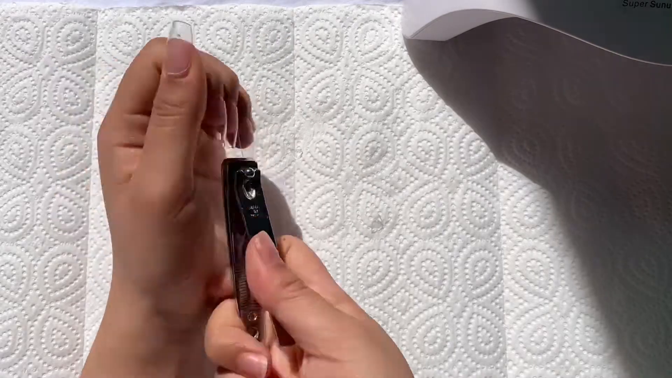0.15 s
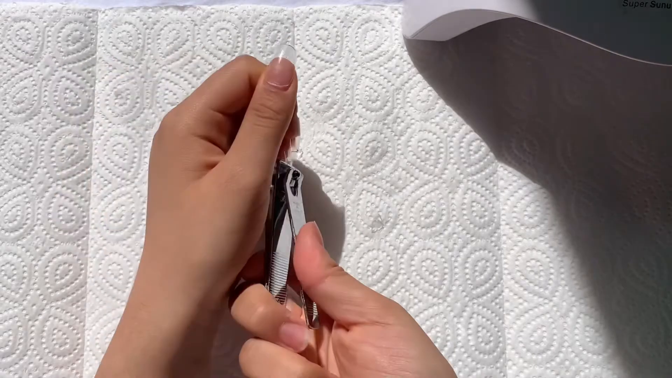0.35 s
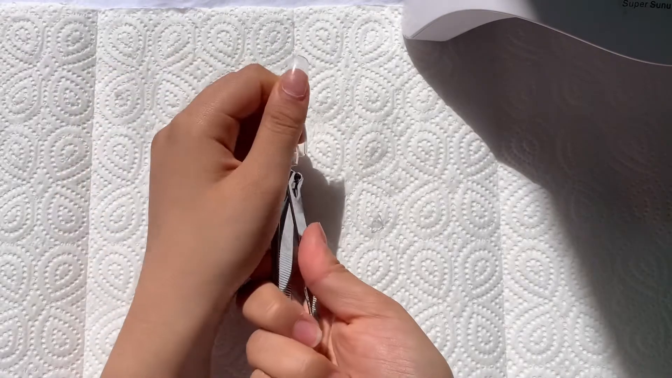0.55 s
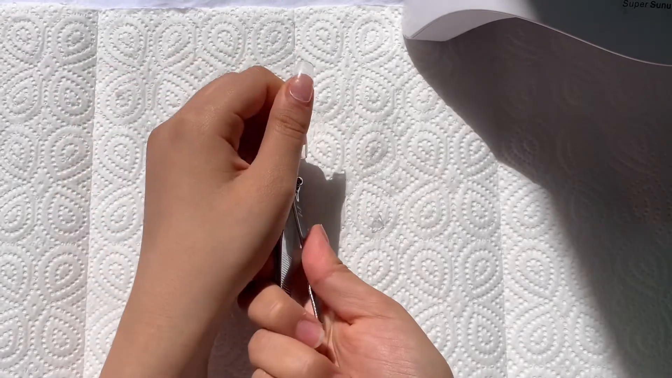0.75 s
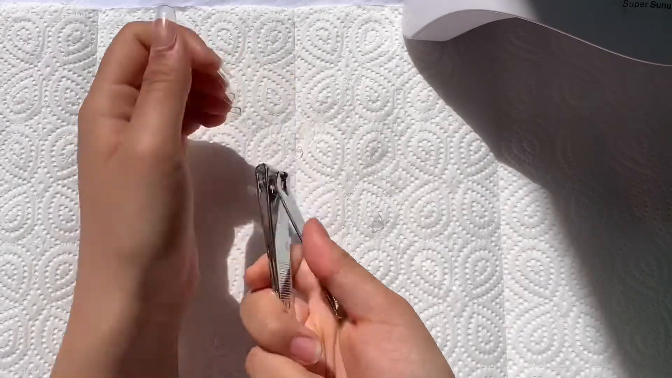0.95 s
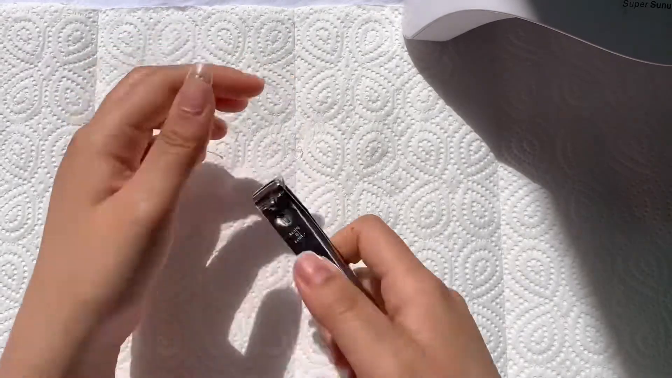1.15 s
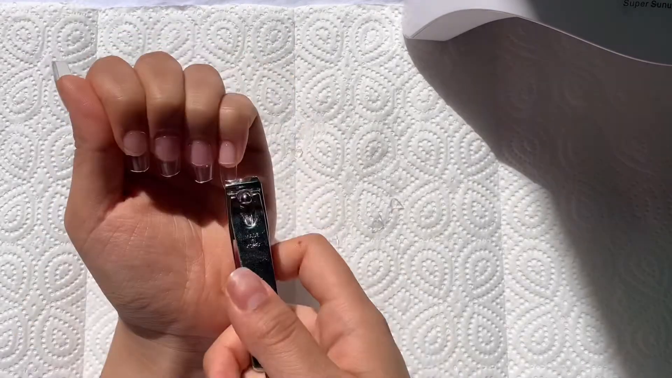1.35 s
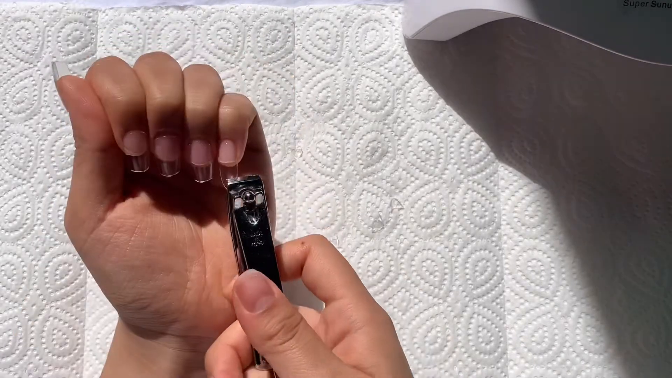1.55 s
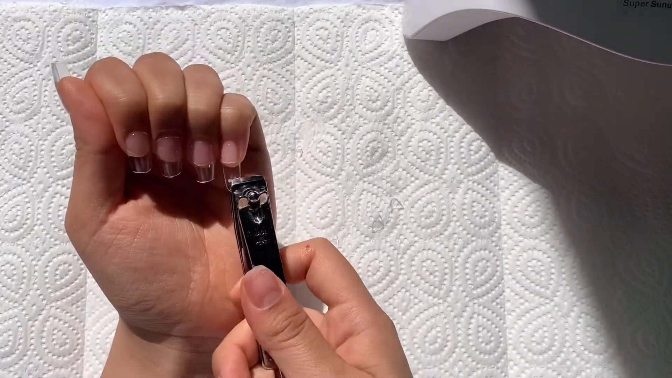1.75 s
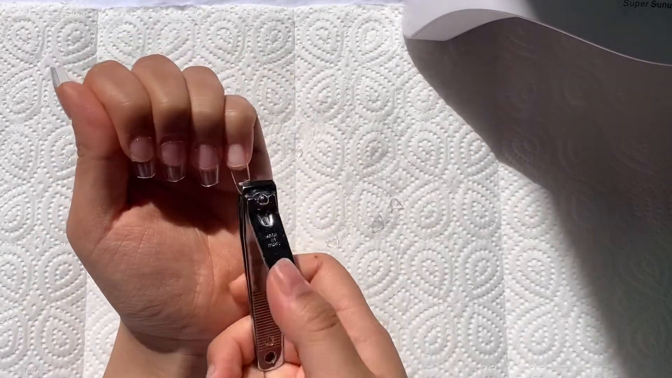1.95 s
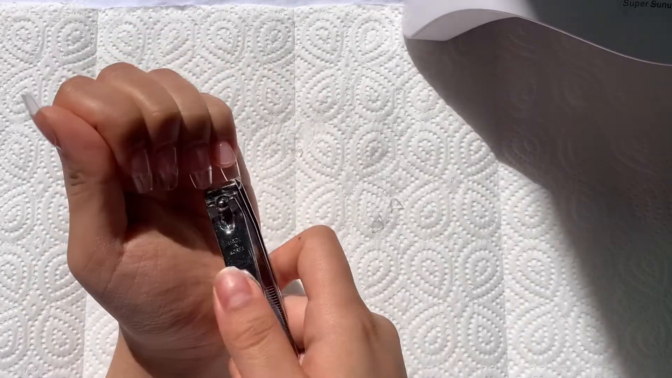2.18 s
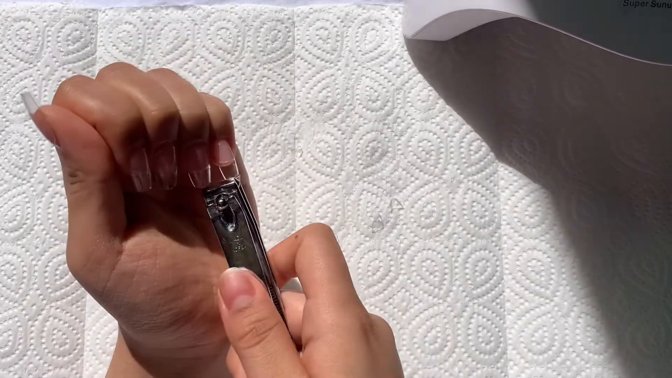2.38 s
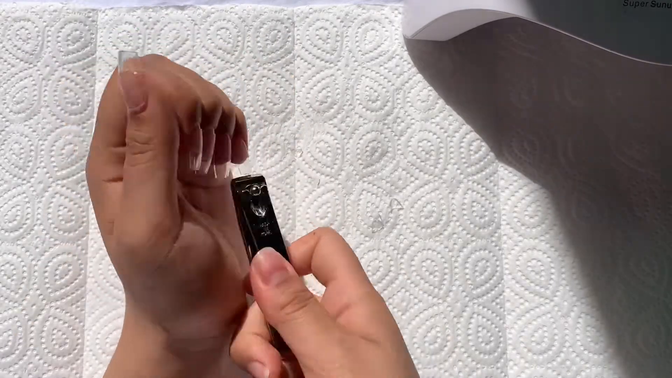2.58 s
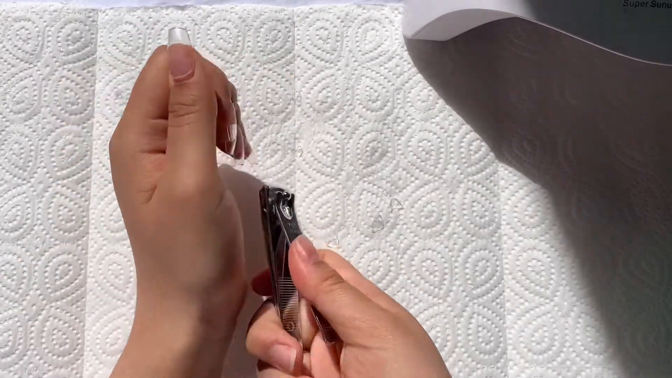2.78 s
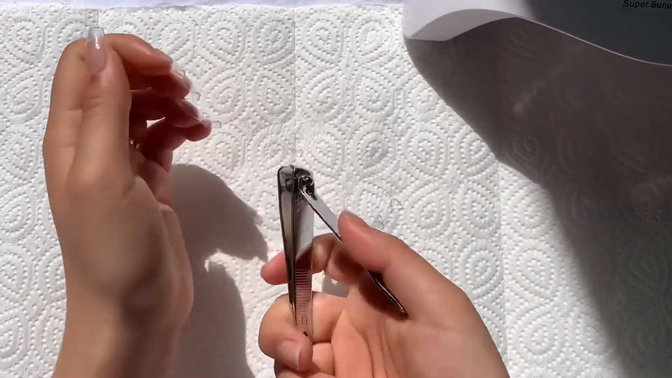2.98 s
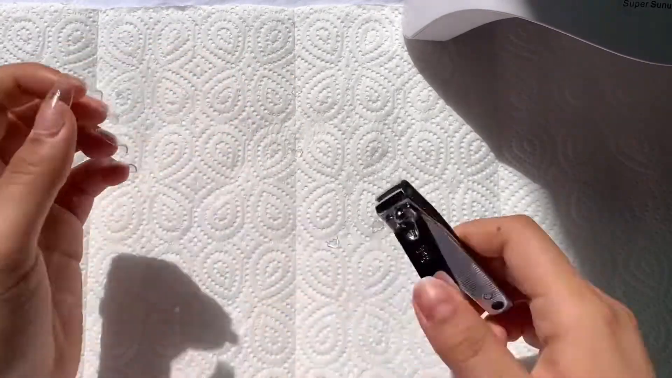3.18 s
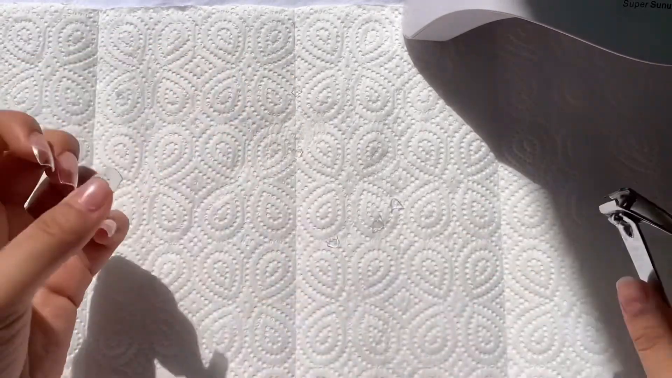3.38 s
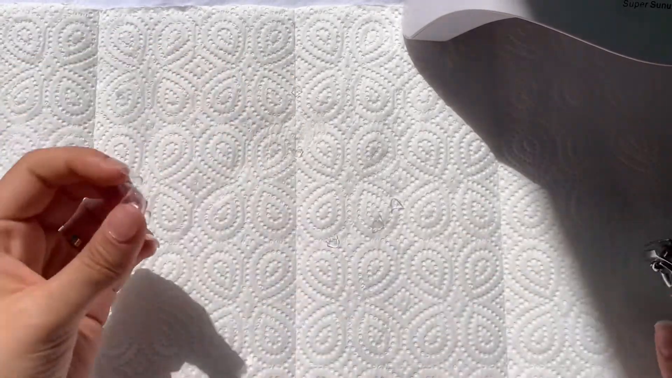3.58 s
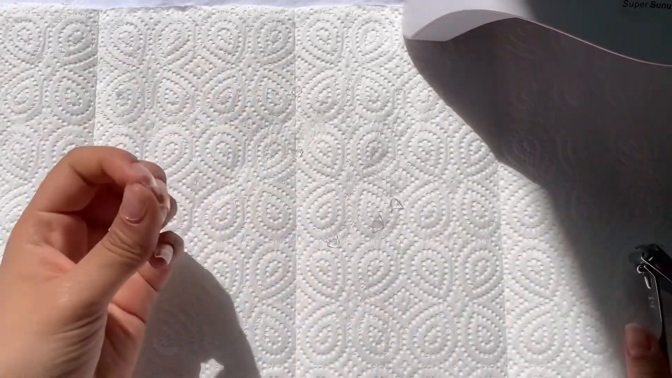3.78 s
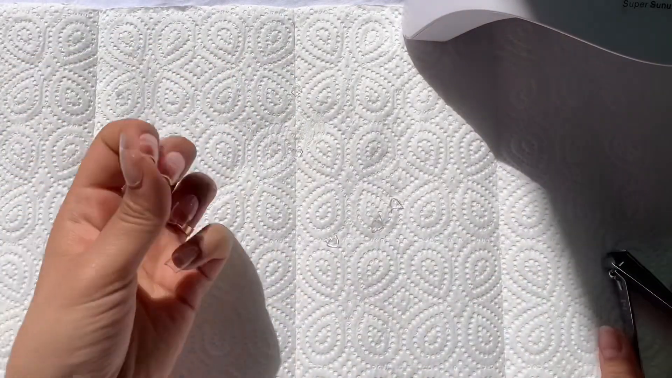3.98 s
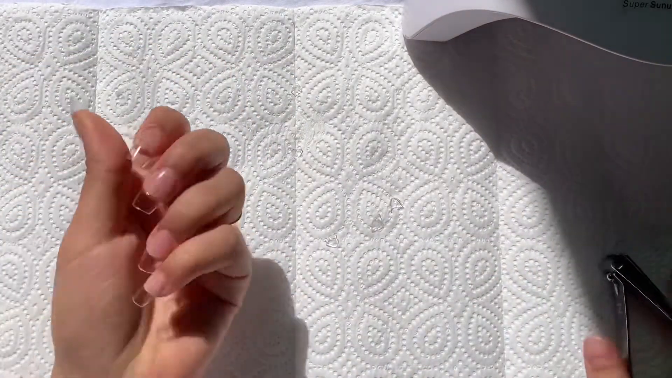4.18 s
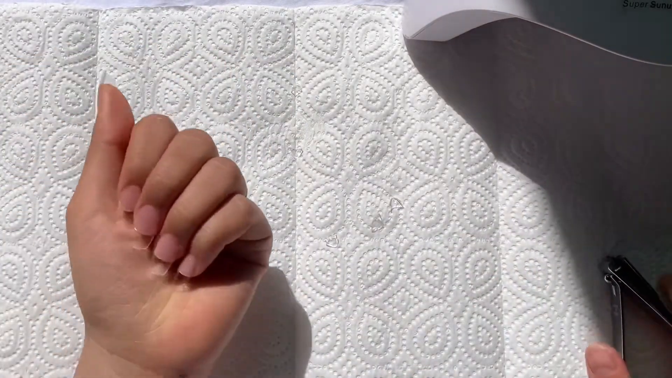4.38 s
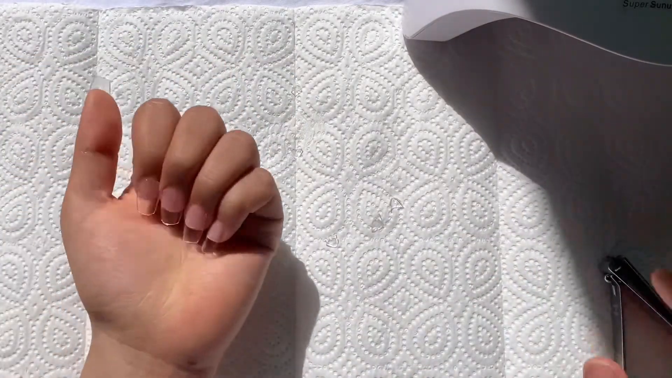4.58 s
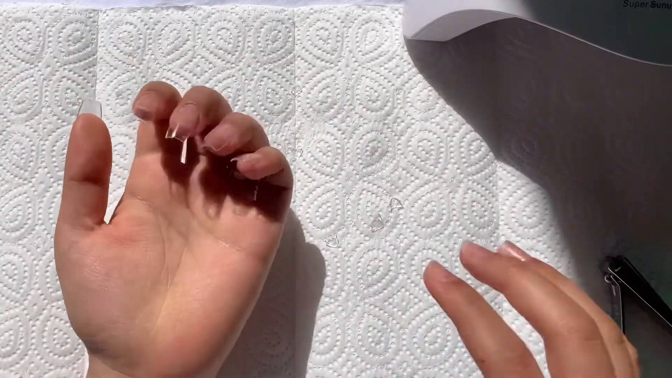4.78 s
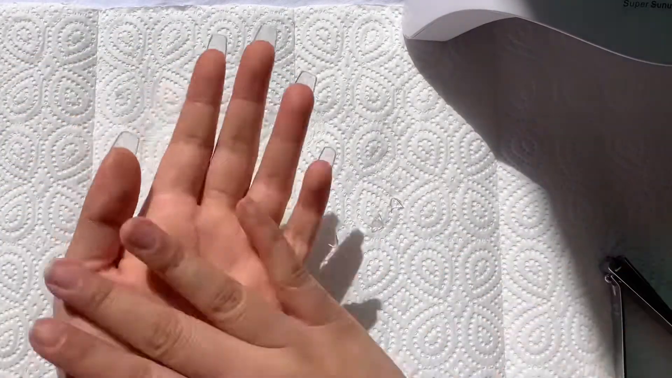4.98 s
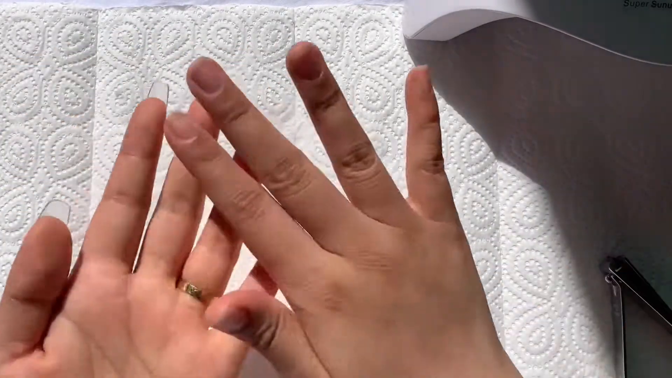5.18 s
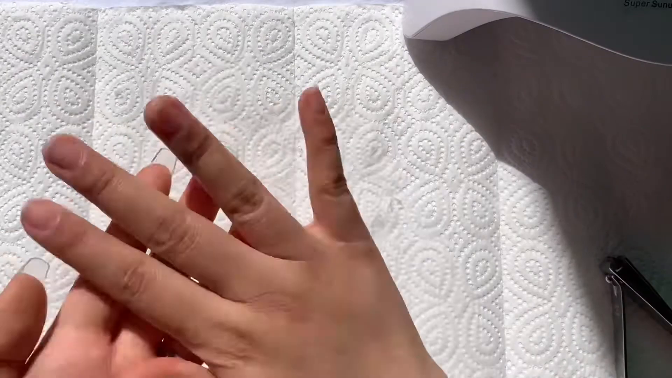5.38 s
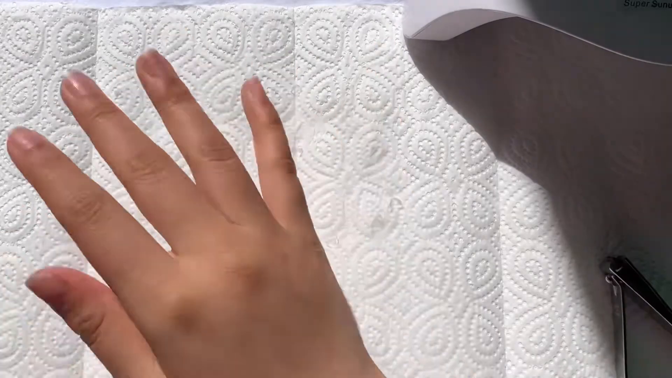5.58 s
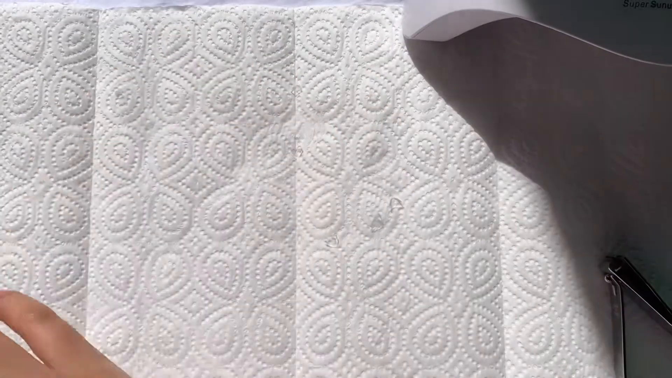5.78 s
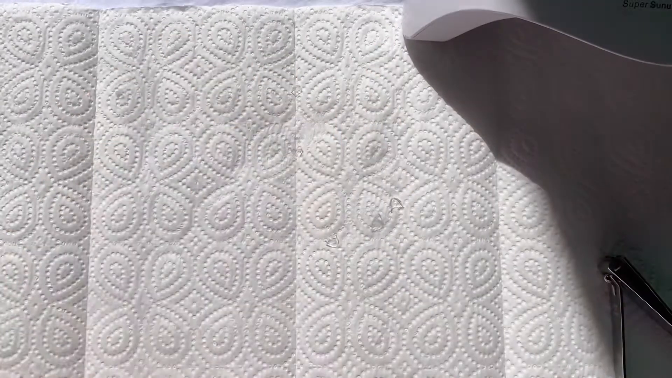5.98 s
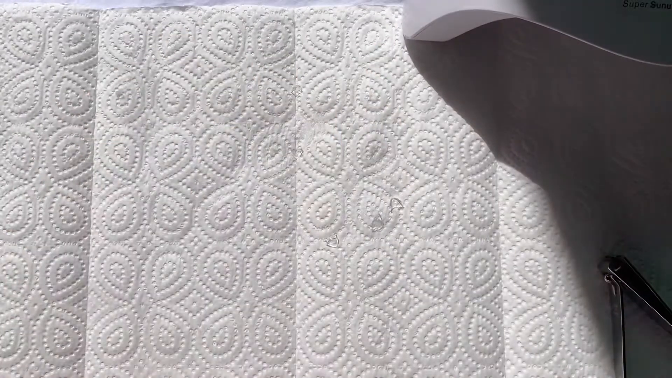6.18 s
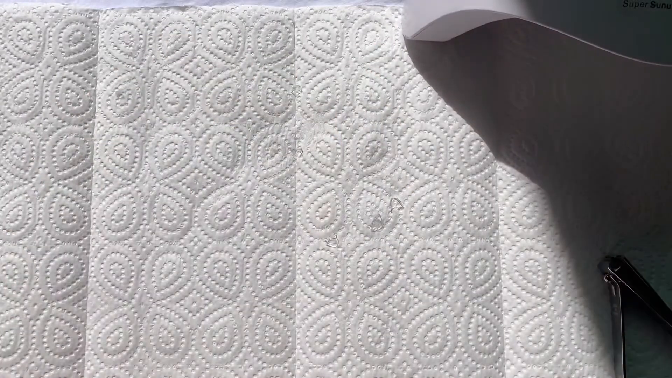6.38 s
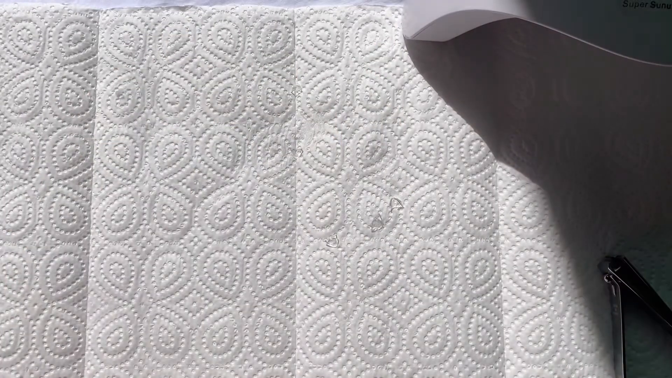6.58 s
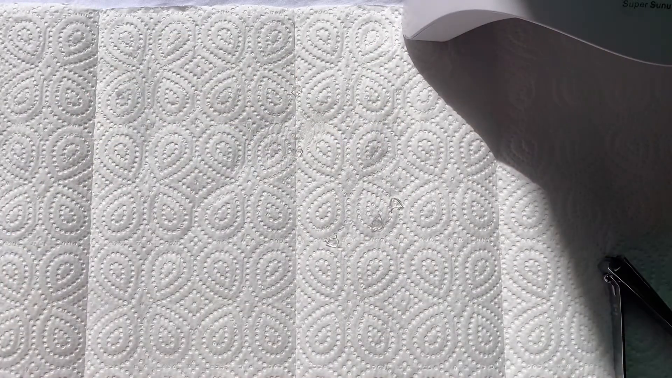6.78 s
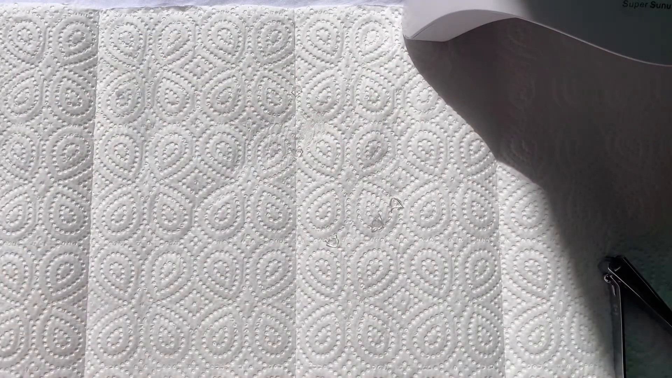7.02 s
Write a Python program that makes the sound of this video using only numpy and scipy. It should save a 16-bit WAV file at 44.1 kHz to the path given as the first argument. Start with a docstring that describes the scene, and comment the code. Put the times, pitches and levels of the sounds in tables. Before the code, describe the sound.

A nail clipper snips three hard plastic tips with sharp, bright cracks very close up, then small ticks, brief palm brushes and a faint creak.

```python
"""A low room murmur and a faint finger rub, then a steel nail clipper snips three plastic nail tips, very close.
The first two snips are several close cracks, the third a single one: noise and modes ring, a small room answers.
A loose lever ticks in between; fingers, cut edges and a palm brushing twice are shaped friction noise.
Last, something creaks softly further off: dull noise, a sinking rough note and slips that ring a body."""
import sys
import numpy as np
from scipy import signal
from scipy.fft import rfft, irfft, next_fast_len
from scipy.io import wavfile
from scipy.ndimage import uniform_filter1d, minimum_filter1d

SR = 44100
rng = np.random.default_rng(int(sys.argv[2]) if len(sys.argv) > 2 else 0)


def log_audio(samples):
    """Write samples as a 16-bit WAV file to the path given in sys.argv[1]."""
    # one column per channel
    frames = np.atleast_2d(samples).T
    # limit to full scale, then quantise
    limited = np.clip(frames, -1, 1)
    pcm = np.round(limited * 32767).astype(np.int16)
    wavfile.write(sys.argv[1], SR, pcm)


N = 310901
TIME = np.arange(N) / SR
BLOW = TIME[:SR // 10]  # time axis of one short blow [s]
CUTOFF_HZ = 16250  # the final low-pass closes here


# cracks running through the tips: (time [s], force [dB], brightness [dB/octave], ring length [share],
#   send to the room [dB], tip pitch [Hz], tip level [dB], tip level towards the room [dB],
#   fracture noise towards the room [dB], highest pitch towards the room [Hz],
#   bounce off a nearby surface [dB], jaws' ring towards the room [dB])
SNIPS = [(0.4845, -1, 6, 0.47, -4, 12020, -13, -12, -17.5, 16000, -23, -3),
         (0.4852, -2.5, 7.5, 0.3, -9.5, 13660, -10.5, -3, -19.5, 17000, -21.5, -8.5),
         (0.4872, -22, -3.5, 0.45, -11, 2130, -20, -23, -18.5, 9000, -18, -3.5),
         (1.5, -20.5, 2, 0.76, -12, 13300, -10.5, -7, -21.5, 13600, -19.5, -3.5),
         (1.5028, -21, 3, 0.97, -12, 6000, -7, -17, -17, 13000, -20, 0),
         (1.5054, 3.5, 9, 0.45, -16, 12690, -7, -7, -14, 12500, -32, -4.5),
         (2.4523, 9, 4, 0.87, -17, 4030, -12, -19, -13, 14500, -23.5, 0)]
# modes of the clipper, before damping: (frequency [Hz], level [dB], T60 [s])
CLIPPER_MODES = [(1993, -32.5, 0.025), (3060, -35, 0.012), (4140, -26, 0.023), (4490, -31, 0.042),
                 (5620, -29.5, 0.019), (7360, -24.5, 0.009), (8110, -18.5, 0.0092), (9000, -21.5, .006),
                 (10270, -12.5, 0.014), (10484, -20, 0.007), (11830, -28, 0.012), (13300, -22, 0.013),
                 (13800, -28, 0.0096), (15600, -28.5, 0.012)]
BOUNCE_S = 0.0068
JAW_NULL_HZ = 2460  # the jaws hardly radiate between their two lowest modes


def snips():
    """Brittle fracture excites tip and jaw modes; returns the direct sound and what goes to the room."""
    direct, sent = np.zeros(N), np.zeros(N)
    for (s, force_db, tilt_db, length, room_db, tip_hz, tip_db, tip_room_db,
         spray_db, top_hz, bounce_db, jaws_db) in SNIPS:
        near_modes = CLIPPER_MODES + [(tip_hz, tip_db, 0.010)]
        near = strike(tilt_db, length, near_modes, spread_s=0.0006, crack_db=-19.0, crack_s=0.0007, low_hz=1640)
        snap = from_db(force_db) * near
        add(direct, s, snap)
        add(direct, s + BOUNCE_S, from_db(bounce_db) * snap)

        # the room gathers all directions, and so more of the broad fracture noise
        jaws = [(hz, level_db + jaws_db, t60) for hz, level_db, t60 in CLIPPER_MODES]
        wide_modes = jaws + [(tip_hz, tip_room_db, 0.010)]
        wide = strike(tilt_db, length, wide_modes, spread_s=0.001, crack_db=spray_db, crack_s=0.0028, low_hz=1140)
        hand_shade = signal.butter(4, top_hz, fs=SR, output="sos")  # the hand shades the treble
        add(sent, s, from_db(force_db + room_db) * signal.sosfilt(hand_shade, wide))
    return signal.lfilter(*signal.iirnotch(JAW_NULL_HZ, 2, fs=SR), direct), sent


def strike(tilt_db, length, modes, spread_s, crack_db, crack_s, low_hz):
    """Modal synthesis: a decaying noise burst plus damped sinusoids, high-passed as small radiators are."""
    hz, level_db, t60 = np.transpose(modes)[:, :, None]
    # dispersion of bending waves in steel: the treble arrives first
    age = np.maximum(BLOW - spread_s * (1 - hz / CUTOFF_HZ), 0)
    decay = np.exp(-np.log(1000) * age / (t60 * length))
    ring = np.sum(from_db(level_db) * np.sin(2 * np.pi * hz * age) * decay, axis=0)
    crack = from_db(crack_db) * rng.standard_normal(len(BLOW)) * np.exp(-BLOW / (crack_s * length))
    # spectral tilt about 10 kHz, level below 2 kHz
    blow = shape(ring + crack, lambda f: from_db(tilt_db * np.log2(np.maximum(f, 2000) / 10000)))
    return signal.sosfilt(signal.butter(3, low_hz, "high", fs=SR, output="sos"), blow)


# lever and cut tips ticking: (time [s], level [dB], lowest pitch radiated [Hz],
#   brightness [dB/octave], ring length [share])
TICKS = [(1.863, -43, 3460, -7.5, 0.34), (1.8713, -39, 3300, -2.5, 0.37), (2.115, -60.5, 1497, -7.5, 0.35),
         (2.578, -35, 800, -3.5, 0.4), (2.664, -59, 2200, -9, .4), (2.72, -57.5, 2490, -9, 0.56),
         (2.835, -54, 5440, -12, 1), (3.118, -31.5, 3600, 1.5, 0.53), (3.136, -31.5, 4810, 5.5, 0.49),
         (3.1403, -28.5, 4570, -4, 0.6), (3.1432, -43, 3030, 2, 0.95), (3.146, -43, 4480, 0.5, 0.94),
         (3.5076, -41.5, 7040, 15, 0.29), (3.53, -45.5, 5000, -4, 0.39), (3.534, -46, 3980, 3, 0.6),
         (4.037, -35, 3040, 3, 0.9), (4.3767, -44, 9000, 4, .4), (4.386, -43, 9500, 6, .4),
         (4.428, -39, 9000, 6, 0.56), (4.8816, -43, 600, -3, 0.81), (4.887, -42, 10000, 3, 0.27),
         (5.218, -52, 7000, 2, .3), (5.2284, -35, 3970, 6, 0.37)]
GRIP_DB = -5.5  # the fingers damp the clipper's ring


def ticks():
    """Light impacts excite the clipper's finger-damped modes, each radiating above its own lowest pitch."""
    out = np.zeros(N)
    damped = [(hz, level_db + GRIP_DB, t60) for hz, level_db, t60 in CLIPPER_MODES]
    for s, level_db, low_hz, tilt_db, length in TICKS:
        tick = strike(tilt_db, length, damped, spread_s=0.00036, crack_db=-8.5, crack_s=0.0023, low_hz=low_hz)
        add(out, s, from_db(level_db) * tick)
    return out


# the lever knocks against its pin: (time [s], level [dB])
LEVER_KNOCKS = [(1.8635, -53), (1.872, -61), (3.118, -68), (3.141, -62)]
# the lever's hand-damped modes: (frequency [Hz], level [dB], T60 [s])
LEVER_MODES = [(543, -11, 0.011), (987, -8, 0.007), (1237, -8, .01), (1670, -23, 0.011)]


def lever_knocks():
    """Impulse response of the lever: each knock on the pin rings its low, damped modes."""
    return knocks(LEVER_KNOCKS, LEVER_MODES)


# dull jolts, as the jaws shut or the hands bump: (time [s], level [dB], fall time [s],
#   starting pitch [Hz], time in which the pitch halves [s])
THUMPS = [(0.487, -51.5, 0.011, 617, 0.0019), (1.506, -41.5, 0.00958, 683, 0.0016),
          (4.169, -55.5, 0.0085, 443, .06), (4.883, -52, 0.0092, 910, 0.0014),
          (5.227, -57, 0.0044, 623, 0.0012)]


def thumps():
    """Frequency glide: a sinusoid whose pitch sinks as its amplitude decays exponentially."""
    out = np.zeros(N)
    for s, level_db, fall_s, top_hz, sink_s in THUMPS:
        cycles = np.cumsum(top_hz / (1 + BLOW / sink_s)) / SR
        add(out, s, from_db(level_db) * np.sin(2 * np.pi * cycles) * np.exp(-BLOW / fall_s))
    return out


# spectrum of skin friction under the palm: (frequency [Hz], density [dB per Hz])
PALM_COLOUR = [(200, -25), (600, -10), (1200, -4.5), (2200, -18.5), (3000, -6), (4000, -6), (7000, -6),
               (10000, -2), (13000, 5.5), (15700, 1.5), (16500, -41)]
CATCH_DB = -9.5  # skin catches, against the smooth friction


def palm(width_hz, hollow_db):
    """Cavity resonance: friction noise passes a resonator tuned to the changing hollow between the hands."""
    gain, hollow_hz = strokes()
    rub = noise(PALM_COLOUR) * grain(per_s=200, depth_db=2.5)
    radius = np.exp(-np.pi * width_hz / SR)  # pole radius sets the bandwidth
    zeros = np.array([1, 0, -1]) * (1 - radius ** 2) / 2
    hollow, state = np.zeros((2, N)), np.zeros((2, 2))
    size = 256  # samples between retunings
    for i in range(0, N, size):
        poles = [1, -2 * radius * np.cos(2 * np.pi * hollow_hz[i] / SR), radius ** 2]
        hollow[:, i:i + size], state = signal.lfilter(zeros, poles, rub[:, i:i + size], zi=state)
    smooth = rms_one(rub + from_db(hollow_db) * hollow)
    return gain * (smooth + from_db(CATCH_DB) * catches(per_s=900, size_db=3.5))


# strokes of the palm over the other hand: (time [s], length [s], level midway [dB], lift-off [dB/s],
#   delay from landing to the most cupped [s], pitch of the hollow then [Hz])
STROKES = [(4.879, 0.13, -47, 245, 0.052, 3100), (5.223, 0.094, -49, 234, 0.016, 3520)]
FLAT_HOLLOW_HZ, CUP_S = 4300, 0.022  # the hollow rises to this pitch as the hands flatten
LAND_S, PRESS_DB = 0.0051, 9  # landing time; pressure lost at either end of a stroke


def strokes():
    """Friction grows with pressure and a larger cavity sounds lower: returns gain and hollow pitch [Hz]."""
    gain, hollow_hz = 0, FLAT_HOLLOW_HZ
    for s, length_s, level_db, lift_db_per_s, cupped_s, cupped_hz in STROKES:
        age = TIME - s
        landed = np.clip(age / LAND_S + 0.5, 0, 1)
        slack = (2 * np.clip(age / length_s, 0, 1) - 1) ** 2  # zero midway, where the palm presses hardest
        lift_db = lift_db_per_s * np.maximum(age - length_s, 0)
        gain = gain + landed * from_db(level_db - PRESS_DB * slack - lift_db)
        cupped = np.exp(-0.5 * ((age - cupped_s) / CUP_S) ** 2)
        hollow_hz = hollow_hz + (cupped_hz - FLAT_HOLLOW_HZ) * cupped
    return gain, hollow_hz


# spectrum of the catching skin: (frequency [Hz], density [dB per Hz])
CATCH_COLOUR = [(500, -6), (1200, 2), (2200, -2), (3000, -3), (6000, 6), (10000, -8), (15500, 12.5),
                (16500, -24)]


def catches(per_s, size_db):
    """Stick-slip: skin ridges let go in random filtered clicks, a few much larger than the rest; rms 1."""
    sizes = from_db(size_db * np.minimum(rng.exponential(1, N), 3)) * rng.choice([-1, 1], N)
    clicks = sizes * (rng.random(N) < per_s / SR)
    return rms_one(shape(clicks, lambda f: from_db(at_hz(CATCH_COLOUR, f))))


# nail edges scraping: (time of the middle [s], level [dB], half length [s])
SCRAPES = [(4.441, -55, 0.006), (4.454, -47.5, 0.0077), (4.9785, -38.5, 0.0015), (4.983, -48, 0.0022),
           (5.002, -52, .004), (5.3332, -35.5, 0.0015), (5.3475, -44, 0.0036), (5.372, -43.5, 0.00099),
           (5.3755, -50, 0.001)]
# spectrum of the scraping edge: (frequency [Hz], density [dB per Hz])
NAIL_COLOUR = [(1000, -21), (2200, -15), (3000, -9), (4000, -10.5), (7000, -18), (9000, -4), (10500, 8),
               (13000, 6), (15500, 4), (17000, -48)]


def scrapes():
    """Dry friction: a cut edge catches and skids for milliseconds as bright, uneven noise."""
    return swells(SCRAPES) * rms_one(noise(NAIL_COLOUR) * grain(per_s=910, depth_db=1.5))


# fingertips rubbing: (time of the middle [s], level [dB], half length [s])
RUBS = [(0.297, -72.5, 0.021), (0.372, -71, 0.027), (2.73, -79, 0.018), (2.865, -73.5, 0.04),
        (3.834, -73, 0.0027), (3.853, -67, 0.023), (4.022, -64, 0.054), (4.037, -67.5, 0.021),
        (4.162, -71.5, 0.013), (4.22, -72, 0.048), (4.41, -77, 0.025)]
# spectrum of the fingertips: (frequency [Hz], density [dB per Hz])
FINGER_COLOUR = [(500, -10.5), (1500, 1), (3000, 0.5), (4500, 4.5), (6000, 2), (8000, -0.5), (10000, 4.5),
                 (15500, 5.5), (16500, -14)]


def fingers():
    """Sliding friction: fingertips on skin and plastic make noise modulated by a fine grain."""
    rub = noise(FINGER_COLOUR) * grain(per_s=2300, depth_db=0.5) * grain(per_s=240, depth_db=2.0)
    return swells(RUBS) * rms_one(rub)


# soft swishes as the arms move: (time of the middle [s], level [dB], half length [s])
SWISHES = [(1.0, -69, 0.1), (3.25, -73.5, 0.086), (5.11, -70.5, 0.15)]
# dull shuffling as the hands shift over the table: (time of the middle [s], level [dB], half length [s])
SHUFFLES = [(1.28, -68.5, 0.052), (2.12, -68.5, 0.25), (5.93, -66, 0.091)]
# spectra of both: (frequency [Hz], density [dB per Hz])
SWISH_COLOUR = [(300, 4.5), (900, -0.5), (2400, -2.5), (4000, -18), (12000, -56)]
SHUFFLE_COLOUR = [(60, -12), (200, -1.5), (340, 3.5), (550, -13.5), (1200, -24.5), (4000, -50)]


def arms():
    """Broadband friction of slow movement: smooth, dull noise under bell-shaped envelopes."""
    return swells(SWISHES) * noise(SWISH_COLOUR) + swells(SHUFFLES) * noise(SHUFFLE_COLOUR)


# decay of the room: (frequency [Hz], T60 [s])
ROOM_T60 = [(300, 0.09), (2000, 0.21), (4000, 0.3), (7000, 0.21), (10000, 0.25), (15000, .16)]
# spectrum of the room's answer: (frequency [Hz], gain [dB])
ROOM_COLOUR = [(300, -3), (1350, -1.5), (1950, 7), (2600, -1), (3200, 2.5), (4100, 5.5), (5200, 1),
               (6500, 0.5), (8500, 4), (10200, 1.5), (11500, -2), (13200, 2.5), (14200, -0.5), (15500, 0),
               (16400, -18)]


def room(x, build_s, uneven_db, decay_exponent):
    """Reverberation: convolution with a clumpy, unit-energy noise tail that decays band by band."""
    t, tail = TIME[:SR // 2], 0
    edges = np.geomspace(200, 17000, 17)  # band limits [Hz]
    for low, high in zip(edges, edges[1:]):
        band_filter = signal.butter(2, [low, high], "band", fs=SR, output="sos")
        band = signal.sosfilt(band_filter, rng.standard_normal(len(t)))
        clumps = grain(per_s=130, depth_db=uneven_db)[:len(t)]
        t60 = at_hz(ROOM_T60, np.sqrt(low * high))
        # an exponent just below 1 lets the decay slow very slightly
        tail = tail + band * clumps * np.exp(-np.log(1000) * (t / t60) ** decay_exponent)
    tail = shape(tail, lambda f: from_db(at_hz(ROOM_COLOUR, f))) * (1 - np.exp(-t / build_s))
    return signal.fftconvolve(x, tail / np.linalg.norm(tail))[:N]


# spectrum of the creak: (frequency [Hz], density [dB per Hz])
CREAK_COLOUR = [(150, -20), (300, -14), (380, -3.5), (600, -13), (900, -12), (1070, -6.5), (1280, -16.5),
                (1700, -17), (2400, -30), (4000, -35), (8000, -54)]
CREAK_START_S, CREAK_ATTACK_S, CREAK_PEAK_S, CREAK_DB = 6.172, 0.02, 6.222, -57
CREAK_RISE_DB_PER_S, CREAK_FALL_DB_PER_S = 150, 205


def creak():
    """Friction noise coloured by a dull body: it sets in softly, swells and dies away exponentially."""
    age = TIME - CREAK_PEAK_S
    level_db = CREAK_DB + np.minimum(CREAK_RISE_DB_PER_S * age, -CREAK_FALL_DB_PER_S * age)
    onset = np.clip((TIME - CREAK_START_S) / CREAK_ATTACK_S, 0, 1)
    return onset * from_db(level_db) * noise(CREAK_COLOUR)


NOTE_START_S, NOTE_HOLD_S, NOTE_DB, NOTE_FALL_DB_PER_S = 6.208, 0.085, -52.5, 135
NOTE_HZ, NOTE_SINK_HZ, NOTE_SINK_S = 1087, 110, 0.013  # final pitch, and the excess that dies away


def creak_note():
    """Stick-slip locks into a periodic note: a sinusoid, rough in pitch and level, sinks and fades."""
    age = np.maximum(TIME - NOTE_START_S, 0)
    hz = (NOTE_HZ + NOTE_SINK_HZ * np.exp(-age / NOTE_SINK_S)) * grain(per_s=350, depth_db=0.55)
    # quick onset, then the slips let go
    held = np.clip(age / 0.0046, 0, 1) * np.clip(1 - (age - NOTE_HOLD_S) / 0.015, 0, 1)
    stutter = grain(per_s=220, depth_db=4.0)
    gain = held * from_db(NOTE_DB - NOTE_FALL_DB_PER_S * age) * stutter
    return gain * np.sin(2 * np.pi * np.cumsum(hz) / SR)


# the creak's larger slips: (time [s], level [dB])
SLIPS = [(6.181, -60), (6.191, -64), (6.206, -53), (6.214, -51), (6.229, -57)]
# modes of the body they knock: (frequency [Hz], level [dB], T60 [s])
CREAK_BODY = [(377, -4, .05), (533, -8, .04), (770, -9, .025), (1150, -4, .025), (1440, -9, .02),
              (1800, -14, .016)]


def creak_slips():
    """Sudden release of strain: each larger slip rings the modes of the creaking body."""
    return knocks(SLIPS, CREAK_BODY)


# spectrum of the room air: (frequency [Hz], density [dB per Hz])
AIR_COLOUR = [(20, -17), (35, -5.5), (55, 0.5), (85, -1.5), (130, -1), (200, -4.5), (270, -4), (400, -13),
              (600, -15), (1100, -21), (2000, -25.5), (3500, -50.5), (8000, -65)]
# spectrum of the microphone hiss: (frequency [Hz], density [dB per Hz])
HISS_COLOUR = [(1000, -3), (3000, 4.5), (6000, -1.5), (10000, -0.5), (13300, 3.5), (13800, 11), (14300, -7),
               (16000, -17)]
# faint hum in the room: (frequency [Hz], level relative to the room air [dB])
HUM = [(58, -13), (119, -12), (165, -9), (267, -13)]


def background(hiss_db, waver_db):
    """Stationary noise made uneven: air bands waver independently, with wandering hum and steady hiss."""
    still, air, hum = noise(AIR_COLOUR), 0, 0
    for centre in 20 * 2 ** np.arange(0, 9, 0.5):  # half-octave bands with triangular overlap
        band = shape(still, lambda f: np.maximum(1 - 2 * np.abs(np.log2(np.maximum(f, 1) / centre)), 0))
        air = air + band * grain(per_s=18, depth_db=waver_db / (1 + centre / 600))  # the bass wavers most
    for hz, level_db in HUM:
        cycles = np.cumsum(hz * grain(per_s=14, depth_db=0.03)) / SR
        tone = grain(per_s=6.5, depth_db=4.5) * np.sin(2 * np.pi * cycles)
        hum = hum + from_db(level_db) * rms_one(tone)
    return from_db(air_level()) * (rms_one(air) + hum) + from_db(hiss_db) * noise(HISS_COLOUR)


# the murmur dips briefly after the first two snips: (time [s], depth [dB], hold [s])
DIPS = [(0.499, 2, 0.046), (1.522, 23.5, 0.036)]
AIR_DB, AIR_START_DB, AIR_SETTLE_S = -64.5, -67.5, 2.9
DIP_FALL_S, DIP_RECOVER_S = 0.05, 0.15


def air_level():
    """Level envelope [dB]: rises to a steady value; each dip falls fast, holds and recovers more slowly."""
    level_db = np.interp(TIME, [0, AIR_SETTLE_S], [AIR_START_DB, AIR_DB])
    for s, depth_db, hold_s in DIPS:
        corners = s + np.cumsum([0, DIP_FALL_S, hold_s, DIP_RECOVER_S])
        level_db = level_db - np.interp(TIME, corners, [0, depth_db, depth_db, 0])
    return level_db


def knocks(rows, modes):
    """Modal superposition: each blow excites the damped modes of one body with strengths of its own."""
    out = np.zeros(N)
    hz, mode_db, t60 = np.transpose(modes)[:, :, None]
    rings = np.sin(2 * np.pi * hz * BLOW) * np.exp(-np.log(1000) * BLOW / t60)
    for s, level_db in rows:
        strength_db = level_db + mode_db + 2 * rng.standard_normal(hz.shape)
        add(out, s, np.sum(from_db(strength_db) * rings, axis=0))
    return out


def swells(rows):
    """Gaussian envelope: the gain of movements that each grow and fade in a bell shape."""
    return sum(from_db(level_db) * np.exp(-0.5 * ((TIME - s) / half_s) ** 2) for s, level_db, half_s in rows)


def grain(per_s, depth_db):
    """Random amplitude modulation: a gain gliding between random values drawn per_s times a second."""
    return from_db(depth_db * np.interp(TIME * per_s, np.arange(N), rng.standard_normal(N)))


# likeness of the two microphones: (frequency [Hz], likeness [0-1])
LIKENESS = [(50, 1), (250, 0.69), (500, 0.05), (1200, 0.15), (3000, 0.081), (4500, 1), (15000, 1)]


def noise(colour):
    """Partial coherence: coloured noise from a shared and an opposed part at two microphones; rms 1."""
    def part(sign):
        def response(f):
            return from_db(at_hz(colour, f)) * np.sqrt(1 + sign * np.clip(at_hz(LIKENESS, f), 0, 1))
        return shape(rng.standard_normal(N), response)
    mid, side = part(1), part(-1)
    return rms_one(np.array([mid + side, mid - side]))


def from_db(db):
    """Logarithmic level: decibels to amplitude gain."""
    return 10 ** (np.asarray(db) / 20)


def rms_one(x):
    """Effective value: scale to unit rms."""
    return x / np.sqrt(np.mean(x ** 2) + 1e-20)


def at_hz(points, hz):
    """Logarithmic pitch scale: read a table along log frequency."""
    f, value = np.transpose(points)
    return np.interp(np.log(np.maximum(hz, 1)), np.log(f), value)


def shape(x, response):
    """Linear filtering: multiply the spectrum by a function of frequency."""
    size = next_fast_len(x.shape[-1] + 2048)
    return irfft(rfft(x, size) * response(np.fft.rfftfreq(size, 1 / SR)), size)[..., :x.shape[-1]]


def add(track, s, sound):
    """Superposition: mix a short sound in at time s."""
    at = round(s * SR)
    track[at:at + len(sound)] += sound[:N - at]


# phase between the two microphones: (frequency [Hz], lead of the left [rad])
LEAD = [(20, 0), (350, 0), (900, -1.3), (1600, -.7), (2500, 1.4), (3400, 1.3), (4800, 3.14), (6900, 6.28),
        (9000, 9.42), (11000, 12.57), (13100, 15.7), (15100, 18.85)]


def microphones(sound):
    """Interchannel phase: half the lead advances the left and half delays the right."""
    return shape(sound, lambda f: np.exp(0.5j * at_hz(LEAD, f) * np.array([[1], [-1]])))


def scene():
    """Superposition of clipper, hands, room and background; the creak is louder at the right."""
    snap, sent = snips()
    tick = ticks() + lever_knocks()
    hands = palm(width_hz=1900, hollow_db=11.5) + fingers() + scrapes()
    to_room = sent + from_db(-10.5) * tick + from_db(-16.0) * hands.mean(axis=0)
    echo = room(to_room, build_s=0.003, uneven_db=3.0, decay_exponent=0.97)
    far = (creak() + creak_note() + creak_slips()) * from_db([[-1.1], [1.1]])
    near = snap + tick + thumps() + hands
    return microphones(near + echo + arms() + far + background(hiss_db=-81.5, waver_db=6.0))


def record(dry):
    """Peak limiting: a fast gain holds the snips under a ceiling, then a steep low-pass cuts the top."""
    ceiling = 0.88  # of full scale, ahead of the low-pass
    allowed = np.minimum(1, ceiling / (np.abs(dry).max(axis=0) + 1e-9))
    gain = uniform_filter1d(minimum_filter1d(allowed, size=33), size=33)
    return shape(dry * gain, lambda f: 1 / (1 + (f / CUTOFF_HZ) ** 160))


dry = scene()
out = record(dry)
log_audio(out)
```